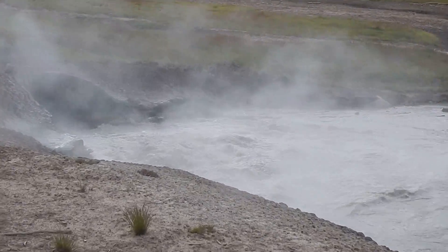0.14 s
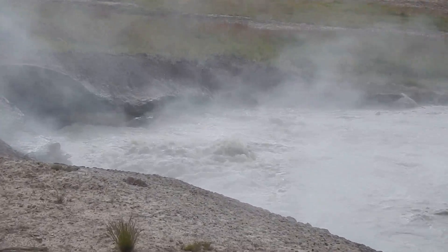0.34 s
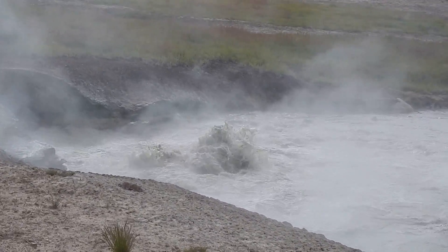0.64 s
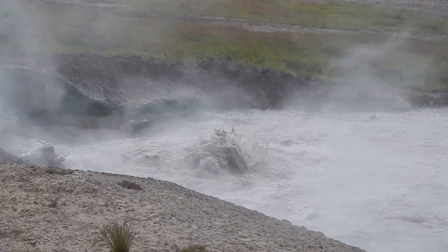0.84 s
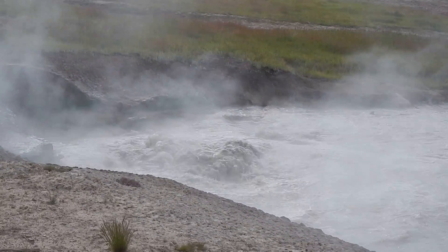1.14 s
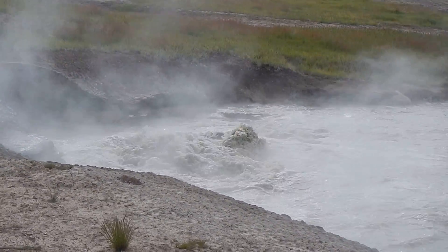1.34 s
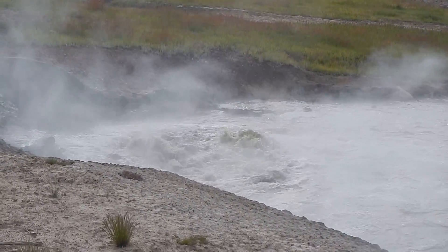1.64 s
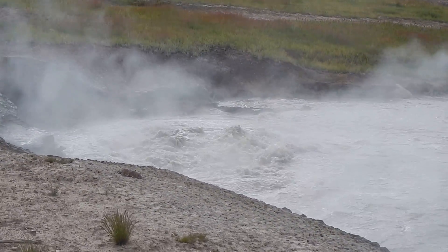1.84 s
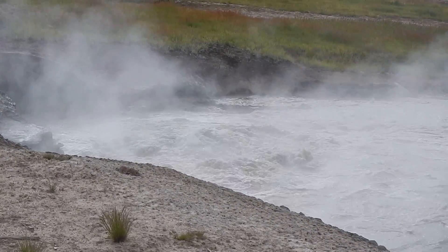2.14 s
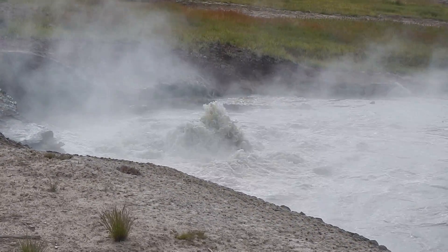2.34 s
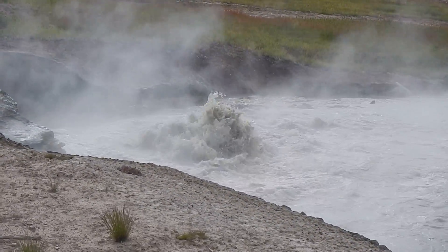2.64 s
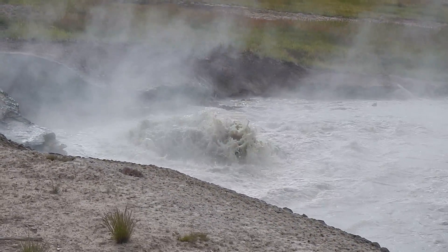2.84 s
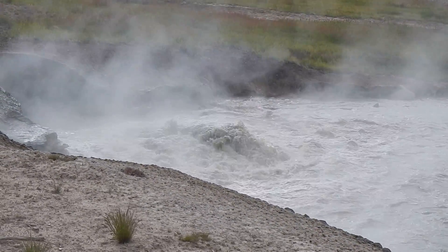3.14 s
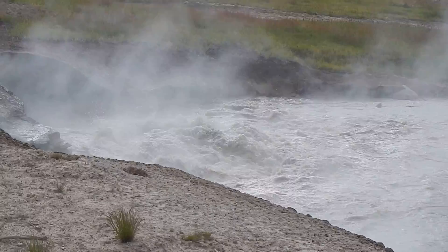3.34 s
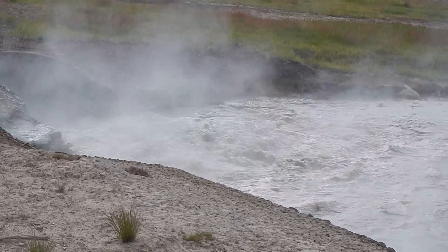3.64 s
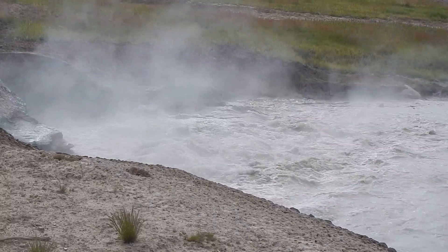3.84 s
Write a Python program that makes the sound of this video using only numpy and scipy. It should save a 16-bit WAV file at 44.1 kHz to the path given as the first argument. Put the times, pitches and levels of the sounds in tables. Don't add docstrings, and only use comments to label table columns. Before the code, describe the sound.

A steaming pool boils steadily outdoors some metres away, surging and splashing with a few small drops; after about a second, wind rumbles and bumps the small stereo microphone, hardest midway through.

```python
import sys
import numpy as np
from scipy import signal
from scipy.fft import rfft, irfft
from scipy.io import wavfile
from scipy.ndimage import uniform_filter1d

SR = 44100
rng = np.random.default_rng(int(sys.argv[2]) if len(sys.argv) > 2 else 0)


def wrap_up_sound(samples):
    columns = np.atleast_2d(samples).T
    tamed = np.clip(columns, -1, 1)
    steps = np.round(tamed * 32767).astype(np.int16)
    wavfile.write(sys.argv[1], SR, steps)


def amplitude_ratio(level_db):
    exponent = np.asarray(level_db, float) / 20
    return 10 ** exponent


N = 176400

# time in seconds, rush level in dB, surge level in dB.
CHURNING = [(0, -45, -49), (.45, -43, -40.5), (.6, -42.5, -44.5), (1.1, -45.5, -40.5), (1.55, -44, -41),
            (1.85, -43.5, -42), (1.98, -42, -38.5), (2.12, -45.5, -45.5), (2.5, -45, -40), (2.9, -40, -42),
            (3.1, -37.5, -39), (3.3, -42.5, -44), (3.6, -42, -42.5), (4, -43, -43)]


def read(points, hz):
    f, value = np.transpose(points)
    return np.interp(np.log(hz + 1), np.log(f + 1), value)


def curve(table, column):
    rows = np.array(table)
    return np.interp(np.arange(N) / SR, rows[:, 0], rows[:, column])


def evened(x):
    return x / np.sqrt(np.mean(x ** 2) + 1e-20)


def colour(x, points):
    n = x.shape[-1]
    gain = amplitude_ratio(read(points, np.fft.rfftfreq(n, 1 / SR)))
    return irfft(rfft(x) * gain, n)


def wander(seconds, channels=1):
    span = max(int(seconds * SR), 1)
    noise = rng.standard_normal((channels, N))
    return evened(uniform_filter1d(uniform_filter1d(noise, span), span))


def wash(points, patch_db, flicker_db):
    # frequency in Hz, coherence from 0 to 1.
    likeness = [(60, 0.93), (200, 1), (800, 0.96), (2000, 0.95), (3300, 0.82), (5500, 0.83), (8000, 0.34)]
    frames, hz = N // 128 + 5, np.fft.rfftfreq(512, 1 / SR)
    a, b, c, d, patch = rng.standard_normal((frames, 257, 5)).T
    flicker = evened(uniform_filter1d(uniform_filter1d(patch[::-1], 60, 0), 3, 1))
    patch = evened(uniform_filter1d(uniform_filter1d(patch, 6, 0), 24, 1))
    same = np.clip(read(likeness, hz), 0, 1)[:, None]
    left = a + 1j * b
    right = same * left + np.sqrt(1 - same ** 2) * (c + 1j * d)
    z = np.array([left, right]) * amplitude_ratio(patch_db * patch + flicker_db * flicker)
    noise = signal.istft(z, nperseg=512, noverlap=384)[1][:, :N]
    return evened(colour(noise, points))


def bubbles(per_s, low_hz, high_hz, cycles, spread_db, count=30):
    size = amplitude_ratio(spread_db * np.minimum(rng.exponential(1, N), 4)) * (rng.random(N) < per_s / SR)
    kind, out = rng.integers(0, count, N), np.zeros((2, N))
    for k, hz in enumerate(np.geomspace(low_hz, high_hz, count)):
        turns = np.arange(0, 4 * cycles / hz, 1 / SR) * hz
        envelope = (1 - np.exp(-turns * 2.4)) * np.exp(-turns / cycles)
        ring = envelope * np.sin(2 * np.pi * turns * (1 + 0.012 * turns))
        ring = ring / np.linalg.norm(ring) * np.sqrt(hz)
        train = signal.oaconvolve(size * (kind == k), ring)[:N]
        out += [train, np.roll(train, rng.integers(-2, 3))]
    return evened(out)


def simmer():
    # frequency in Hz, level in dB.
    murmur = [(40, -21), (200, -3.5), (500, -12.5), (2500, -26), (5000, -19), (9000, -53)]
    shared, left, right = rng.standard_normal((3, N))
    return amplitude_ratio(-48.5) * evened(colour(shared + 0.41 * np.array([left, right]), murmur))


def surge():
    # frequency in Hz, level in dB.
    heave = [(30, -22), (65, 1), (170, 1), (430, -4), (740, -8), (1100, -19.5), (2000, -28.5),
             (4000, -40.5)]
    large = bubbles(300., 415, 1586, cycles=4.5, spread_db=3.5)
    swell = wash(heave, patch_db=2.5, flicker_db=1.0) + amplitude_ratio(-12.5) * large
    return swell * amplitude_ratio(curve(CHURNING, column=2) + 4.0)


def rush():
    # frequency in Hz, level in dB.
    foam = [(400, -3.5), (900, -5), (2400, -4.5), (2690, -3), (2950, -9), (7000, -8), (9000, -33),
            (12000, -30)]
    fizz = evened(colour(bubbles(1500., 926, 8080, cycles=9.2, spread_db=3.0), foam))
    flow = wash(foam, patch_db=1.15, flicker_db=0.5) + amplitude_ratio(-6) * fizz
    return flow * amplitude_ratio(curve(CHURNING, column=1) + 2.0)


def hiss():
    # frequency in Hz, level in dB.
    circuit = [(3000, -5.5), (9000, -0.5), (15000, -6)]
    return amplitude_ratio(-67) * evened(colour(rng.standard_normal((2, N)), circuit))


def spatters():
    # start in seconds, peak in dB, pitch in Hz, length in seconds.
    landings = [
        (0.168, -31.5, 4050, 0.0031),
        (0.402, -38, 3880, 0.0045),
        (0.496, -32, 2080, 0.0049),
        (0.548, -27, 2140, 0.007),
        (0.543, -36, 3870, 0.0039),
        (1.1, -45, 1960, 0.0037),
        (1.959, -32.5, 3900, 0.0062),
        (1.968, -33.5, 2140, 0.024),
    ]
    out, t = np.zeros((2, N)), np.arange(0, .12, 1 / SR)
    for s, db, hz, length in landings:
        band = [(hz / 4, -40), (hz * 0.69, -14), (hz, 0), (hz * 1.93, -14), (hz * 3, -60)]
        drops = evened(colour(rng.standard_normal(len(t)), band))
        u = t / max(length, .001)
        swell = u * np.exp(1 - u) / 2
        out[:, round(s * SR):][:, :len(t)] += amplitude_ratio(db + 0.5) * drops * swell
    return out


def slosh():
    # time in seconds, level in dB.
    throw = [(0, -62), (.42, -67.5), (.55, -43.5), (1.1, -42), (1.7, -47.5), (1.98, -43), (2.5, -47),
             (2.75, -55), (3.1, -38), (3.4, -43.5), (4, -41.5)]
    # frequency in Hz, level in dB.
    slap = [(300, -33), (700, 4), (1300, 3.5), (2300, -1), (3200, -10.5), (6000, -14), (9000, -35)]
    rings = evened(colour(bubbles(3000., 605, 7000, cycles=3.5, spread_db=2.0), slap))
    return (rings + 0.42 * wash(slap, patch_db=3.5, flicker_db=2.5)) * amplitude_ratio(curve(throw, column=1))


def eddies():
    # time in seconds, level in dB.
    gust = [(0, -65), (.55, -44), (1.12, -59), (1.23, -29.5), (1.5, -30.5), (1.58, -43), (1.72, -30.5),
            (2.08, -34.5), (2.15, -32.5), (2.3, -24), (2.9, -25.5), (3.03, -46.5), (3.15, -25),
            (3.36, -31.5), (3.55, -27), (3.68, -29), (3.85, -22), (4, -29)]
    # frequency in Hz, level in dB.
    eddy = [(12, -21), (22, -4), (62, 4), (130, -5.5), (230, -12), (620, -38.5), (1200, -56), (5000, -101)]
    lumps = amplitude_ratio(2.9 * wander(0.025, channels=2) + 0.92 * wander(0.016))
    noise = evened(colour(rng.standard_normal((2, N)), eddy))
    return noise * lumps * amplitude_ratio(curve(gust, column=1) + 1.5)


def bumps(table, cycles):
    # frequency in Hz, level in dB.
    turbulence = [(15, -26), (60, 5.5), (150, -6.2), (320, -6), (700, -25), (4000, -84)]
    sag, flutter_s, lag_s = 0.37, .012, .005
    out, t = np.zeros(N + SR), np.arange(-.06, .06, 1 / SR)
    for (s, db, hz), phase in zip(table, rng.random(len(table))):
        turns = t * hz
        envelope = np.exp(-(turns / cycles) ** 2 / 2)
        push = envelope * np.cos(2 * np.pi * (turns - sag * turns ** 2 / 2 + phase))
        noise = evened(colour(rng.standard_normal(len(t)), turbulence))
        flutter = noise * np.exp(-((t - lag_s) / flutter_s) ** 2 / 2)
        out[round((s - .06) * SR):][:len(t)] += amplitude_ratio(db - 0.44) * (push + amplitude_ratio(-21) * flutter)
    return out[:N]


def buffeting():
    # time in seconds, peak in dB, pitch in Hz.
    left_bumps = [
        (0.555, -25, 90),
        (0.71, -21, 70),
        (1.015, -23.5, 56.6),
        (1.119, -16.5, 73),
        (3.503, -12, 107),
        (3.92, -15, 184),
        (3.942, -18, 151),
                  (1.273, -13, 114), (1.315, -15, 103), (1.343, -10, 195), (1.358, -20, 153),
                 (1.4, -14, 203), (1.45, -12, 109), (1.722, -11, 185), (1.746, -14.5, 136),
                 (1.801, -15, 121), (1.881, -9.5, 132), (1.955, -13, 150), (2.041, -2.5, 140),
                 (2.079, -11, 211), (2.094, -10.5, 96), (2.207, -18, 115), (2.217, -6.5, 139),
                 (2.228, -14, 82), (2.255, -11.5, 99), (2.275, -9, 210), (2.29, -13, 102),
                 (2.37, -9.5, 162), (2.385, 3.5, 98), (2.413, -16, 133), (2.427, -3.5, 163),
                 (2.434, -12, 142), (2.495, -12, 109), (2.543, 2, 186), (2.61, -20, 104),
                 (2.646, -1.5, 103), (2.682, -7, 93), (2.738, -13, 92), (2.75, -12.5, 78), (2.775, -1, 185),
                 (2.826, -15, 177), (2.886, -6, 220), (2.911, -12, 180), (2.926, -13, 96),
                 (2.948, -12.5, 95), (3.227, -13, 79), (3.296, -6.5, 117), (3.31, -16, 136),
                 (3.435, -8, 158), (3.741, -9.5, 154), (3.803, -17, 110), (3.828, -10, 206),
                 (3.847, -25, 95), (3.863, -16, 138)]
    # time in seconds, peak in dB, pitch in Hz.
    right_bumps = [(1.268, -9.5, 100), (1.341, -9.5, 249), (1.363, -18, 93), (1.446, -15, 81),
                   (1.461, -26, 86.4), (1.497, -10.5, 154), (1.526, -13, 130), (1.803, -10, 165),
                   (1.894, -22, 112), (1.924, -13.5, 202), (2.037, -18, 138), (2.054, -10.5, 109),
                   (2.104, -12, 121), (2.206, -12.5, 132), (2.233, -10, 100), (2.293, -16.5, 158),
                   (2.308, -11.5, 126), (2.376, -3, 170), (2.407, -6.5, 127), (2.421, -0.5, 121),
                   (2.431, -6, 174), (2.499, -12.5, 121), (2.529, -13, 102), (2.552, -1, 293),
                   (2.617, -9, 109), (2.628, -6.5, 156), (2.654, -3.5, 137), (2.684, -10, 133),
                   (2.746, -11, 128), (2.757, -1.5, 177), (2.78, -9.5, 181), (2.884, -6.5, 133),
                   (2.906, -8.5, 117), (2.92, -11, 134), (2.94, -13, 163), (3.114, -14.5, 113),
                   (3.13, -16, 124), (3.164, -17, 105), (3.229, -4, 126), (3.289, -11, 110),
                   (3.479, -14, 113), (3.629, -12.5, 180), (3.755, -11, 135), (3.801, -12, 125),
                   (3.831, -17, 178), (3.918, -13, 111), (3.959, -11.5, 143)]
    return np.array([bumps(left_bumps, cycles=0.3), bumps(right_bumps, cycles=0.43)])


def snaps():
    # time in seconds, peak in dB, port (0 left, 1 right).
    kink_times = [(1.34, -24, 1), (1.802, -22, 1), (2.041, -27, 0), (2.277, -32, 0), (2.297, -25.5, 1),
                  (2.379, -27, 0), (2.384, -21, 0), (2.384, -19.5, 1), (2.418, -41, 0), (2.426, -30, 1),
                  (2.424, -12.5, 0), (2.429, -21, 1), (2.429, -22.5, 0), (2.441, -21.5, 1), (2.502, -25, 1),
                  (2.54, -10.5, 0), (2.549, -13, 1), (2.556, -28, 0), (2.555, -13.5, 1), (2.64, -18.5, 1),
                  (2.644, -27, 0), (2.647, -23.5, 1), (2.657, -22, 1), (2.662, -23.5, 1), (2.679, -20.5, 1),
                  (2.757, -20, 1), (2.762, -28, 0), (2.772, -18, 0), (2.777, -23.5, 1), (2.872, -26.5, 0),
                  (2.886, -21.5, 0), (3.136, -35.5, 0), (3.222, -25.5, 1)]
    # frequency in Hz, level in dB.
    edge = [(100, -4.5), (300, 14), (600, 2), (1400, -12), (2300, -25.5), (8000, -80)]
    rebound_s = 0.001376
    kinks = np.zeros((2, N))
    for (s, db, port), (sign, wait) in zip(kink_times, rng.random((len(kink_times), 2))):
        at = round(s * SR) + np.array([0, round(rebound_s * (1 + wait) * SR)])
        kinks[round(port), at] = amplitude_ratio(db + 12) * np.sign(sign - .5) * np.array([1, -.55])
    unit = colour(np.arange(N) == 0, edge).max()
    return colour(kinks, edge) / unit


def through_case(water):
    # frequency in Hz, gain in dB.
    case = [(2200, -0.33), (3050, -7.5), (3500, -3), (4100, 5.5), (4350, -2), (4650, -10), (5900, -2.7),
            (6600, -13)]
    # frequency in Hz, left minus right in dB.
    tilt = [(2200, -0.5), (2700, -9), (3200, 4.5), (4000, 3), (4700, -1), (7000, -2)]
    left, right = colour(water, case)
    return np.array([colour(left, [(f, db / 2) for f, db in tilt]),
                     colour(right, [(f, -db / 2) for f, db in tilt])])


def scene():
    water = simmer() + surge() + rush() + spatters() + slosh()
    wind = eddies() + buffeting() + snaps()
    return through_case(water) + hiss() + wind


def top_cut(x):
    return signal.sosfilt(signal.butter(12, 15700, fs=SR, output="sos"), x)


def record(dry):
    # frequency in Hz, width in Hz, depth in dB.
    notches = [(2500, 90, -9), (3190, 120, -18), (4700, 220, -4), (5000, 90, -10)]
    duck_s, duck_db, hold_s, recover_db_per_s = 2.543, 4.5, .06, 42
    hz = np.fft.rfftfreq(N, 1 / SR)
    dips_db = sum(db * np.exp(-(2 * (hz - f) / width) ** 2) for f, width, db in notches)
    notched = irfft(rfft(dry) * amplitude_ratio(dips_db), N)
    since = np.arange(N) / SR - duck_s
    recovered_db = recover_db_per_s * np.maximum(since - hold_s, 0)
    dip_db = np.clip(duck_db - recovered_db, 0, None) * (since > 0)
    ducked = notched / amplitude_ratio(uniform_filter1d(dip_db, size=100))
    mix = np.clip(ducked, -.995, .995)
    return top_cut(mix)


dry = scene()
out = record(dry)
wrap_up_sound(out)
```